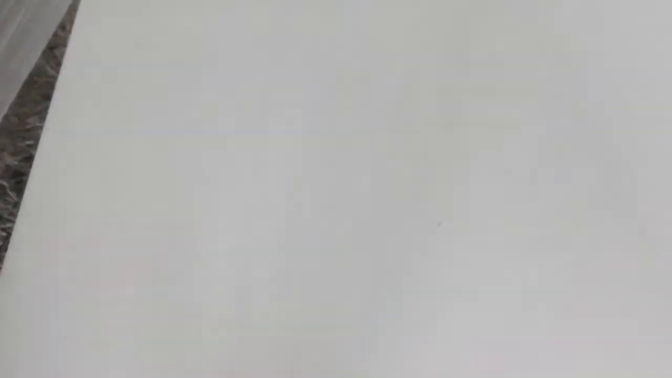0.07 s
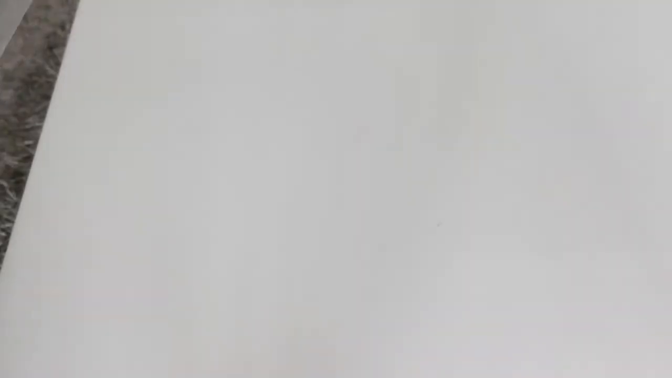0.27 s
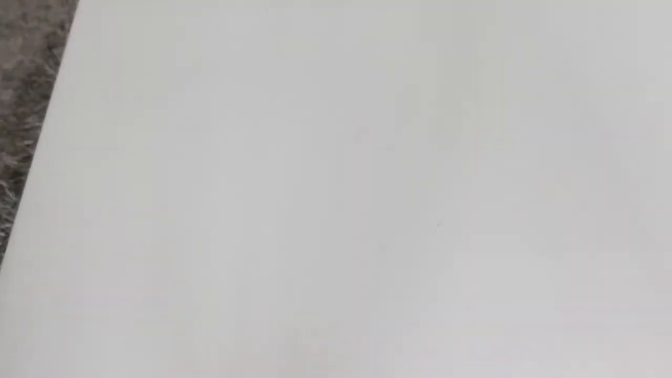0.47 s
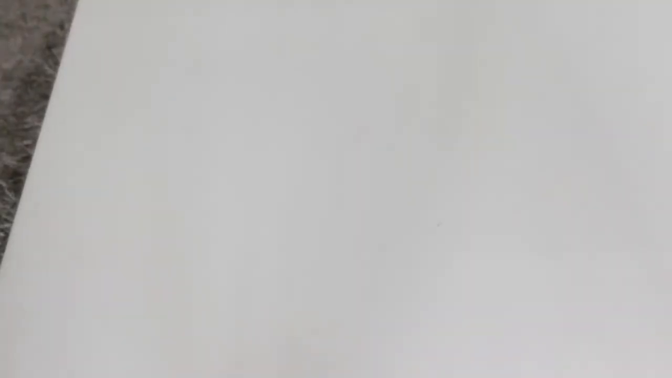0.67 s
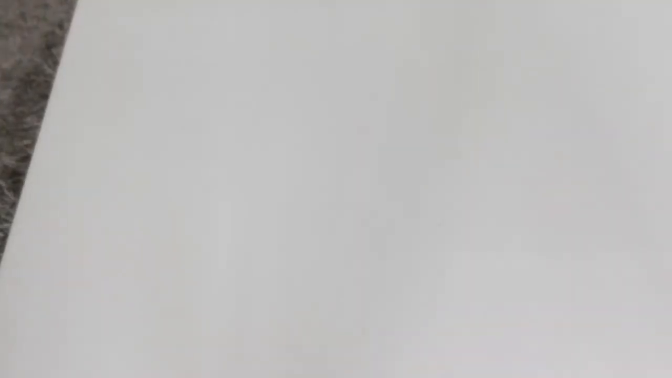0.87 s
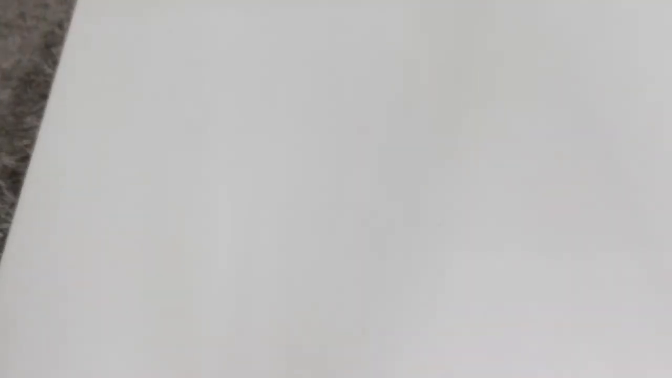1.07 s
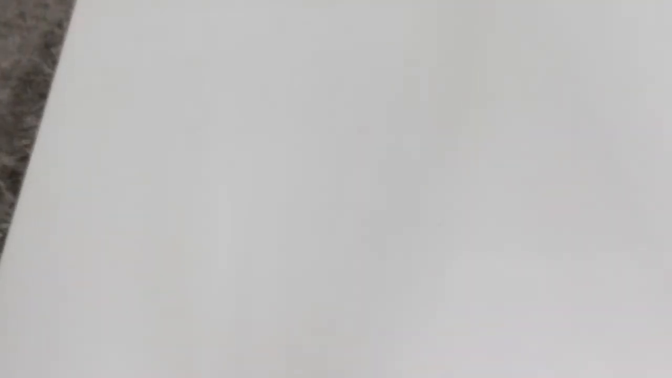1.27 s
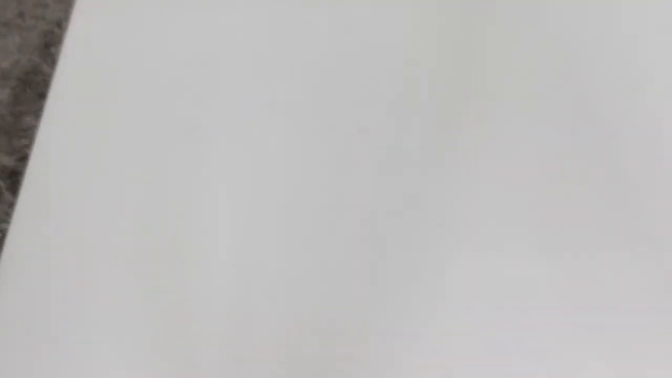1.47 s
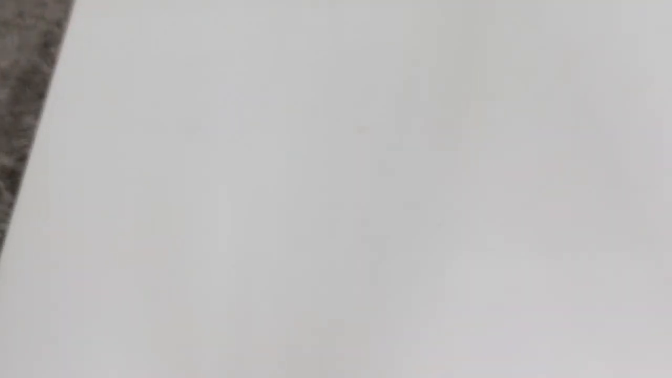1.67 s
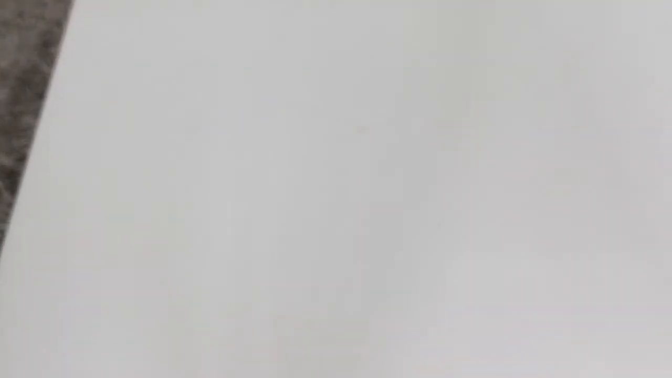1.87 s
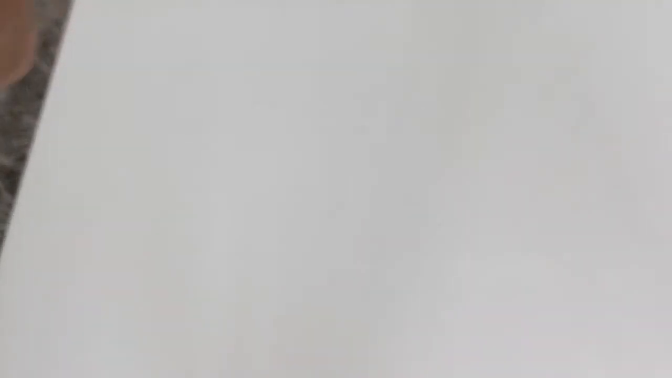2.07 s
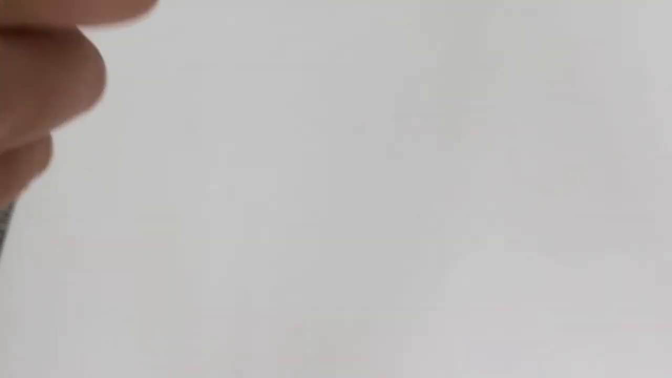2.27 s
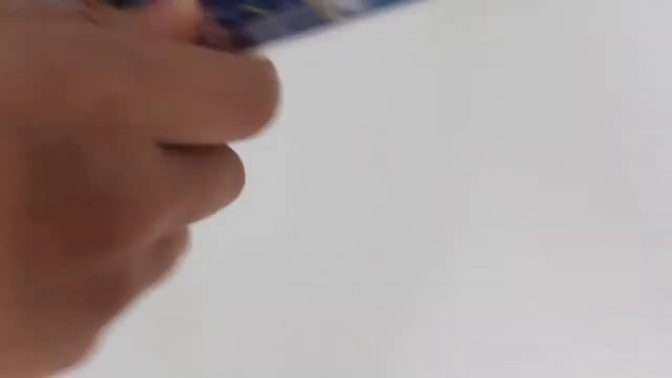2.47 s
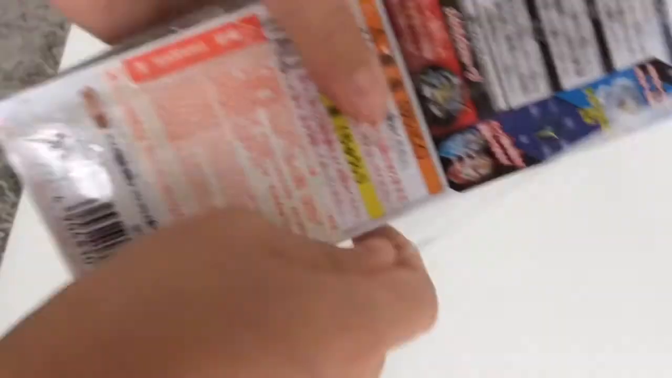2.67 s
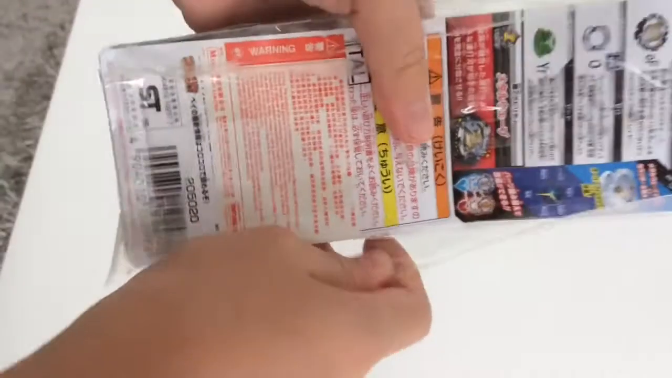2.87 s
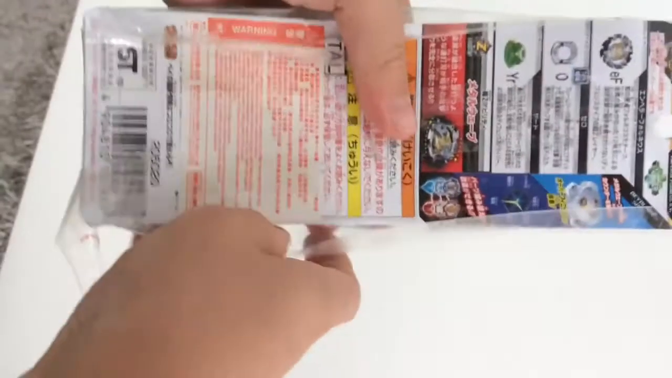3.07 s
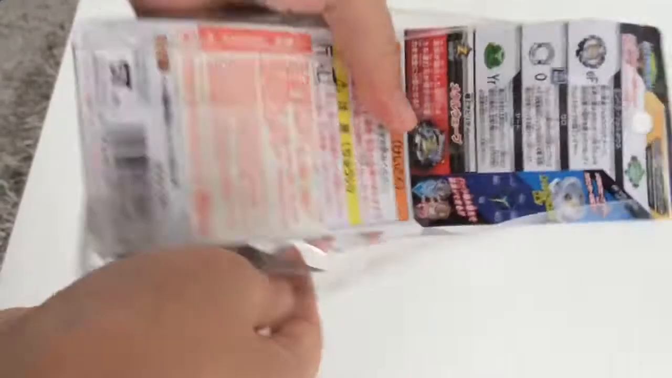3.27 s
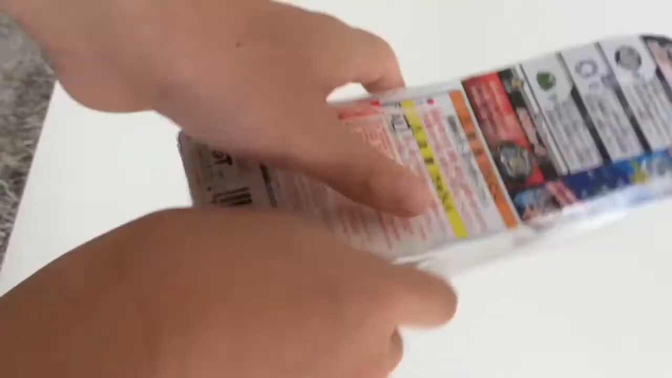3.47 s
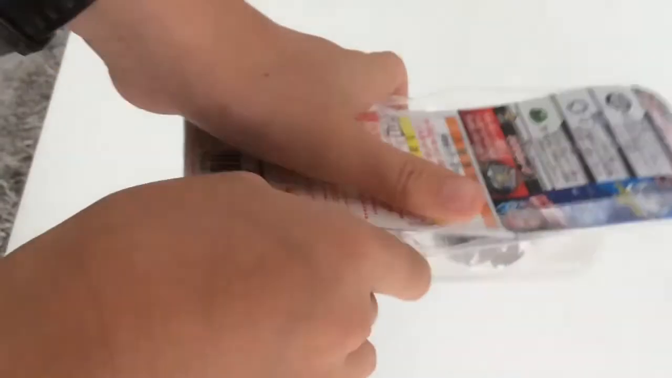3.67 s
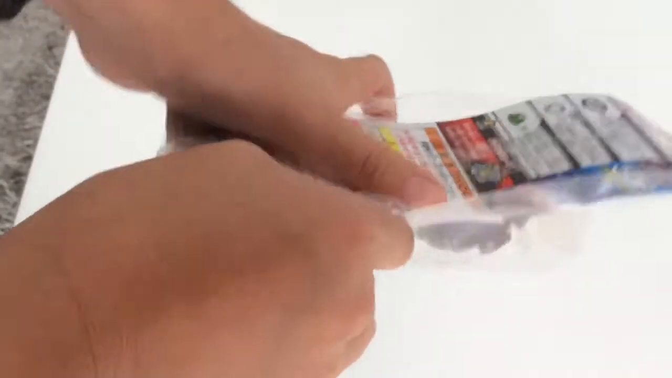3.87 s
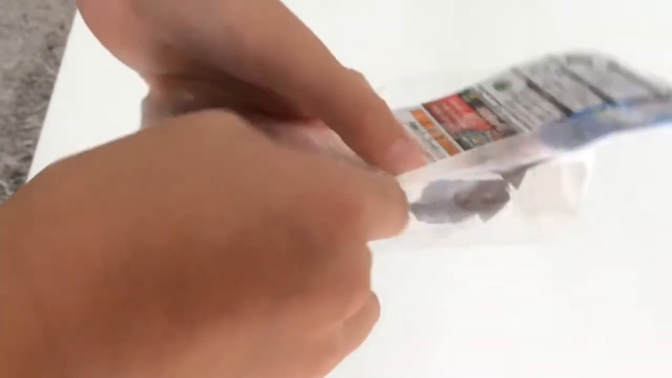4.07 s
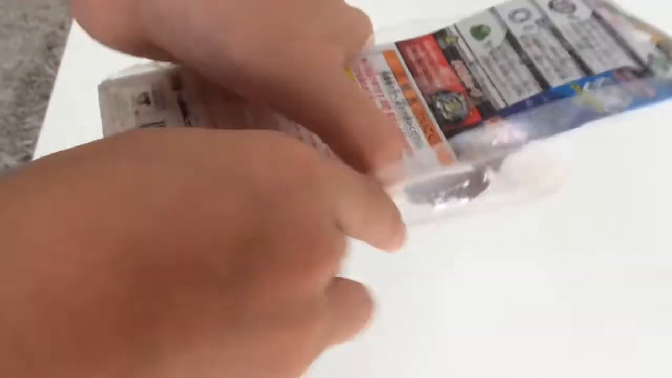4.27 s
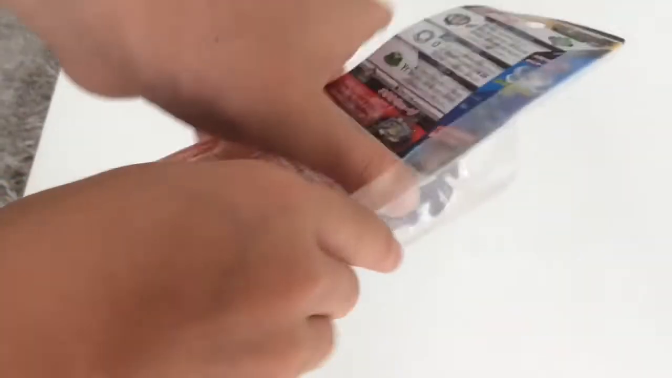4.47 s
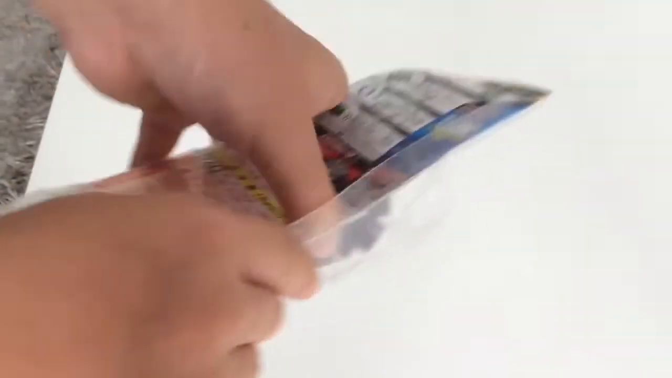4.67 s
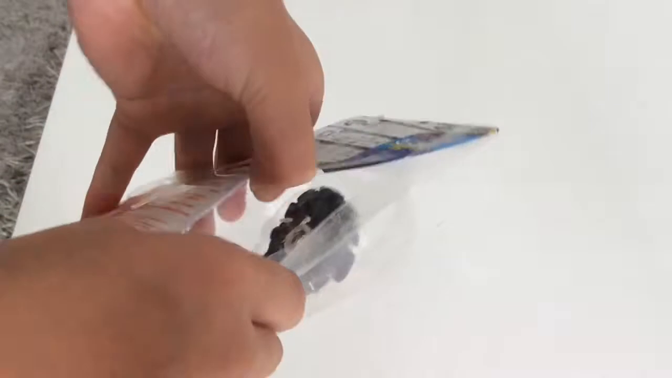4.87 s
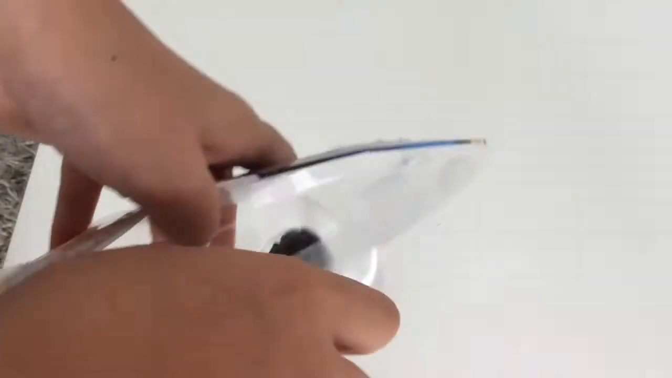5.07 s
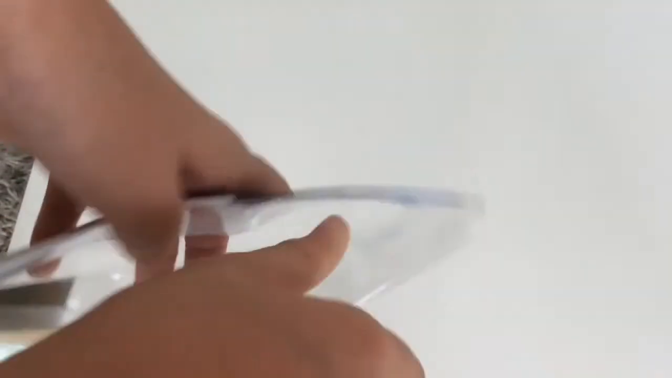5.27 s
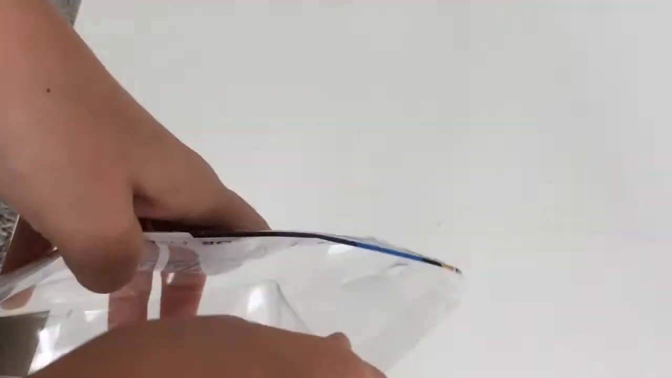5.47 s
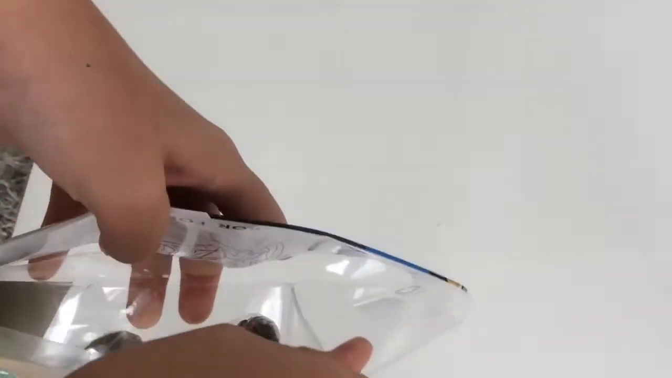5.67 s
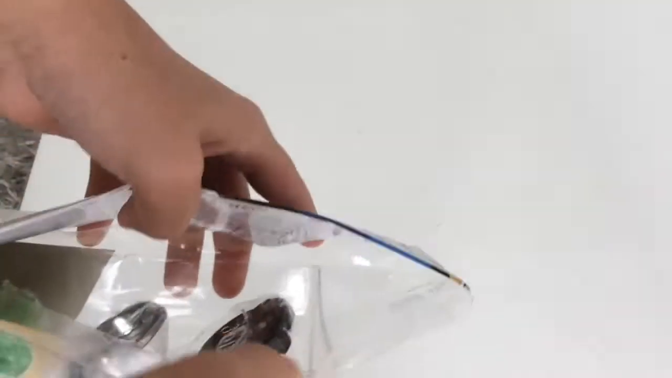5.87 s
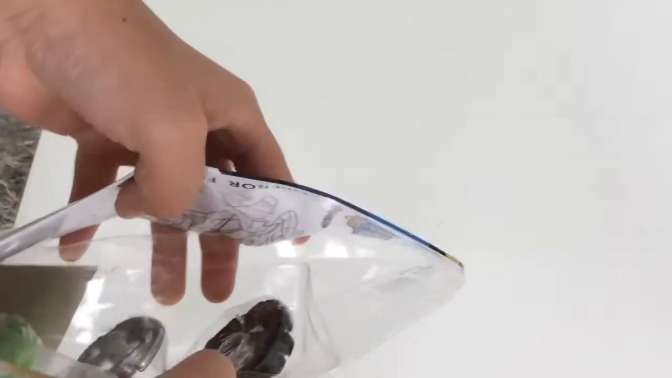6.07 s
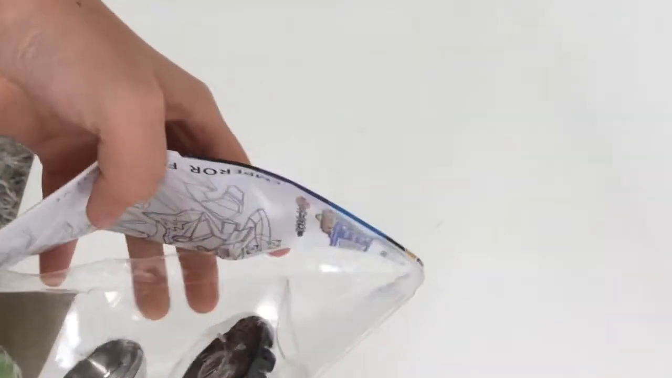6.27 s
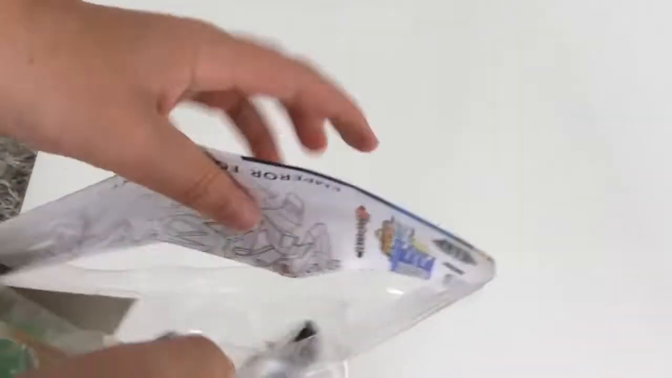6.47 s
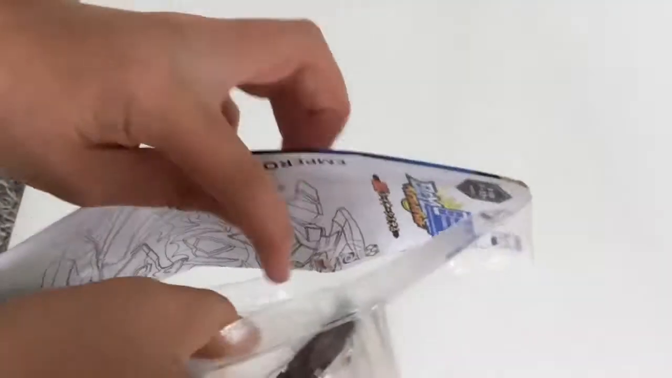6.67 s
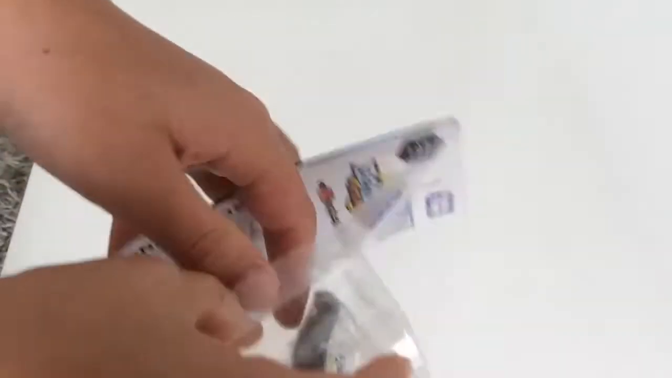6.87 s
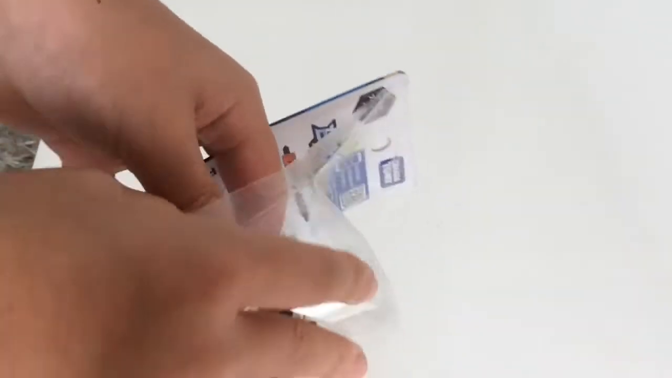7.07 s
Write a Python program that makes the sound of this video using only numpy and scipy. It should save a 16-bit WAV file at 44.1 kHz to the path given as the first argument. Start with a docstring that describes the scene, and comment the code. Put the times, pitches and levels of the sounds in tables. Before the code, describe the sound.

Close, dry handling of stiff plastic and card in a small room, over faint low room tone. At about 0.1 s the pack knocks twice on the table, boxy with a sharp crack. It is then almost silent, with a small bright click near 0.9 s. From 1.4 to 2.7 s there are soft low bumps, muffled rubbing, light ticks and a faint creak around 2.2 s. From 2.8 s crackling thickens with short seal creaks; loud snaps and hollow pops land near 3.3 and 3.4 s with a scratchy slide. More cracks follow at 3.8 s, fine creaks around 4.0-4.2 s, and a strong snap at 4.3 s. The biggest hollow pop comes at 5.0 s. Lighter, scattered crinkles follow, then hard cracks with thumps around 6.3 s, sharp snaps at 6.55 and 6.75 s, and small ticks around 7.1 s.

```python
"""A stiff plastic blister is pried off its backing card close to a microphone, in a small room.
Creases crack as noise bursts through sheet resonances; the seal creaks in runs of the same snaps.
Walls of the hollow pop as damped sines; the film slides and rustles as grains of noise in bands.
Early on the pack knocks on the table; later, soft contacts thump at low pitch. Room tone is steady."""
import sys
import numpy as np
from scipy import signal
from scipy.fft import rfft, irfft, next_fast_len
from scipy.io import wavfile
from scipy.ndimage import map_coordinates

SR = 44100
rng = np.random.default_rng(int(sys.argv[2]) if len(sys.argv) > 2 else 0)


def pcm_store(signal):
    """Save signal as 16-bit PCM."""
    levels = np.round(np.clip(np.atleast_2d(signal), -1, 1) * 32767)
    wavfile.write(sys.argv[1], SR, levels.astype(np.int16).T)


N = 314433  # length in samples


def amp(db):
    """Decibel law: the amplitude gain of a level in dB."""
    return 10 ** (np.asarray(db) / 20)


def unit(x):
    """Normalization: x at rms 1."""
    return x / np.sqrt(np.mean(x ** 2) + 1e-20)


def peak(rows):
    """Normalization: each row at peak 1."""
    return rows / np.abs(rows).max(axis=1, keepdims=True)


def along(points, hz):
    """Logarithmic frequency scale: (Hz, value) points joined by straight lines on it."""
    f, v = np.transpose(points)
    return np.interp(np.log(hz + 1), np.log(f + 1), v)


def filtered(x, response):
    """Linear filtering: the spectrum of x times a response of frequency."""
    n = x.shape[-1]
    padded = next_fast_len(n + 4096)
    spectrum = rfft(x, padded) * response(np.fft.rfftfreq(padded, 1 / SR))
    return irfft(spectrum, padded)[..., :n]


def body(modes):
    """Modal superposition: causal resonances (Hz, width Hz, dB) summed with alternating sign."""
    def mode(f, center, width, db):
        return amp(db) * 1j * f * width / (center * center - f * f + 1j * f * width)
    return lambda f: sum((-1) ** k * mode(f, *row) for k, row in enumerate(modes))


def ring(t, hz, t60, rise):
    """Free decay of one mode: a damped sine with a soft start."""
    return np.sin(2 * np.pi * hz * t) * amp(-60 * t / t60) * (1 - np.exp(-t / rise))


def place(times, sounds):
    """Superposition: rows of sounds summed at their times."""
    out = np.zeros(N + sounds.shape[1])
    for start_s, row in zip(times, sounds):
        out[round(start_s * SR):][:len(row)] += row
    return out[:N]


def grains(rate, spread_db, life):
    """Stick-slip friction: random slips (per s) of uneven size, each a puff of noise decaying over life (s)."""
    size = amp(spread_db * np.minimum(rng.exponential(size=N), 3))
    slips = (rng.random(N) < rate / SR) * size
    envelope = signal.lfilter([1], [1, -np.exp(-1 / (life * SR))], slips)
    return unit(envelope * rng.standard_normal(N))


# spectral shape of the room tone: pitch_hz [Hz], relative density_db [dB]
AIR_SPECTRUM = [(15, -73.5), (30, -16), (80, -1), (140, -10.5), (245, -11), (400, -18), (700, -24),
                (3000, -36.5), (7700, -28.5), (11000, -36.5), (15500, -43.5), (16500, -62)]
AIR_DB = -62  # rms level


def air():
    """Stationary noise: white noise shaped into the steady room tone."""
    return amp(AIR_DB) * unit(filtered(rng.standard_normal(N), lambda f: amp(along(AIR_SPECTRUM, f))))


# handling over time: start_s [s], flexing_db of the hollow [dB], sliding_db of the film [dB]
HAND_MOTION = [(0.0, -51, -73), (0.18, -53, -60), (0.42, -75, -73.5), (1.41, -76, -74.5),
               (1.57, -54, -65.5), (2.66, -51, -60), (3.06, -42, -57.5), (3.37, -43, -39.5),
               (3.53, -51, -59), (4.13, -48.5, -52), (4.39, -43.5, -57), (4.71, -59.5, -59.5),
               (4.91, -51, -67.5), (5.04, -36, -50), (5.18, -55, -68), (5.66, -51, -62), (6.31, -41, -73),
               (6.41, -46, -67), (6.91, -63.5, -62.5), (7.13, -52, -73)]
# resonances of card and trapped air: pitch_hz [Hz], width_hz [Hz], level_db [dB]
HOLLOW_MODES = [(152, 108, -13), (456, 113, -7), (728, 73, -1.5), (952, 355, -11)]
# resonances of the sheet, which the cracks excite too: pitch_hz [Hz], width_hz [Hz], level_db [dB]
SHEET_MODES = [(1410, 286, 0), (2260, 280, -3), (3185, 1150, -0.5), (3956, 2290, -2.5), (5650, 1660, -4.5)]
# its treble resonances, likewise shared: pitch_hz [Hz], width_hz [Hz], level_db [dB]
SIZZLE_MODES = [(7590, 1470, 9), (9980, 360, 9), (12300, 8900, 3)]
FIZZ_DB = -3  # treble of the sliding, relative to its rustle
GRIP_RATE, GRIP_DB = 9, 5  # the grip wavers: knots per second, depth in dB


def handling():
    """Forced resonance: countless small creases and rubbing fingers excite the sheet and the hollow."""
    s, *levels = np.transpose(HAND_MOTION)
    murmur, rustle = (amp(np.interp(np.arange(N) / SR, s, db)) for db in levels)
    rubbing = grains(rate=910, spread_db=3.5, life=0.00098)
    ticks = grains(rate=200, spread_db=4, life=0.0004)
    flexing = grains(rate=220, spread_db=3, life=0.004)
    knots = rng.standard_normal(int(N * GRIP_RATE / SR) + 4)
    grip = map_coordinates(knots, [np.arange(N) * GRIP_RATE / SR])
    murmur = murmur * amp(GRIP_DB * grip)
    hollow = unit(filtered(flexing + 0.15 * rubbing, body(HOLLOW_MODES)))
    sheet = unit(filtered(rubbing + 0.1 * ticks, body(SHEET_MODES)))
    fizz = unit(filtered(0.28 * rubbing + ticks, body(SIZZLE_MODES)))
    return murmur * hollow + rustle * sheet + amp(FIZZ_DB) * rustle * fizz


# gain of the top treble toward the microphone as the pack turns: start_s [s], level_db [dB]
TREBLE_TURN = [(0.1, 14.5), (0.6, 3), (1.5, -19), (3.2, -11), (3.9, -16), (4.601, -35), (5.4, -36),
               (6.2, -25), (7.0, -13)]


def facing(x):
    """Directivity: the top treble is beamed, so it follows the turn of the pack."""
    s, db = np.transpose(TREBLE_TURN)
    top = filtered(x, lambda f: 1 / (1 + (11000 / (f + 1)) ** 8))
    return x + top * (amp(np.interp(np.arange(N) / SR, s, db)) - 1)


def snap(rows, life, facet_share, alike):
    """Impulsive excitation: a crease gives way in a noise burst that rings the sheet and its own facet."""
    s, db, crease_hz, sizzle_db = np.asarray(rows)[:, :, None]
    t = np.arange(SR // 20) / SR
    t60 = life * amp(0.063 * (db + 54.5))  # big ones last longer
    facet_t60, sizzle_t60 = 0.22 * t60, 0.41 * t60
    onset = 0.0011  # s
    noise = rng.standard_normal((len(s), 2, len(t)))
    # a shared share of noise makes the snaps alike
    noise = (noise + alike * noise[0]) * (1 - np.exp(-(t / onset) ** 2))
    sheet = peak(filtered(noise[:, 0] * amp(-60 * t / t60), body(SHEET_MODES)))
    facet = peak(ring(np.maximum(t - onset / 2, 0), crease_hz, facet_t60, 0.00055))
    sizzle = peak(filtered(noise[:, 1] * amp(-60 * t / sizzle_t60), body(SIZZLE_MODES)))
    burst = 0.65 * sheet + facet_share * facet + amp(sizzle_db) * sizzle
    return place(s[:, 0] - onset / 2, amp(db) * burst)


# single creases giving way: start_s [s], level_db before the layers are weighted [dB],
# pitch_hz of the crease [Hz], sizzle_db relative to level_db [dB]
CREASES = [(0.0855, -22.5, 2030, -18), (0.1315, -8, 3030, -14), (0.1372, -17.5, 6260, -3.5),
           (0.832, -38.5, 2650, -13), (0.8918, -20.5, 4430, 5.5), (0.906, -31, 6000, -5),
           (1.4125, -23, 2260, -8.5), (1.479, -35, 2370, -4.5), (1.5763, -32.5, 2190, -19),
           (1.6282, -27, 2080, -17), (1.9798, -29.5, 5700, -3), (2.106, -33, 2280, -9),
           (2.3782, -24, 6500, -3.5), (2.4124, -27.5, 3730, 3.5), (2.566, -21.5, 5700, 5),
           (2.7083, -27.5, 6400, 9), (2.8237, -23, 2300, 3), (2.8829, -31, 3870, 3),
           (2.8988, -21, 3850, -1.5), (3.1976, -29.5, 5930, 7), (3.2167, -24.5, 3700, 1),
           (3.2382, -25, 3550, 3), (3.2506, -30, 6600, 12.5), (3.2655, -11.5, 3360, 0.5),
           (3.275, -21.5, 4850, -2), (3.2834, -17.5, 3200, -1), (3.4048, -7.5, 2370, -12),
           (3.423, -26, 5000, 2), (3.4828, -26.5, 2700, 3), (3.4936, -29, 2760, -2),
           (3.6238, -34, 5760, 15.5), (3.616, -33, 3280, -1), (3.633, -56, 6450, 24),
           (3.7338, -34, 5960, 12), (3.6934, -27, 2080, 7), (3.7011, -23, 2920, 5.5),
           (3.7152, -32, 2870, 9), (3.7739, -15.5, 2600, -0.5), (3.803, -11, 3230, -17),
           (3.814, -21, 3600, -18), (3.8272, -22, 2870, -11), (3.9444, -22, 5650, -12),
           (4.2823, -25, 2550, 2), (4.2906, -7.5, 3640, 0.5), (4.3293, -23, 1930, -17),
           (4.4326, -30, 3500, -2), (4.55, -31.5, 3800, 1), (4.609, -19, 2610, -2.5),
           (4.6145, -22.5, 3330, -16), (4.8946, -13.5, 3780, -5.5), (4.9324, -24, 2300, -6),
           (5.0157, -10.5, 2500, -2.5), (5.0372, -24, 3320, -5), (5.0693, -26, 3380, -22),
           (5.4324, -27, 4030, -4), (5.503, -28, 4500, -13), (5.6111, -34.5, 2920, -2),
           (5.621, -36.5, 4000, 5), (5.683, -35, 5030, -2), (5.77, -48, 3500, -10),
           (5.8127, -19, 2370, -40), (5.848, -40, 6500, -1), (5.918, -29.5, 6500, -6),
           (5.952, -39.5, 4000, -1.5), (6.236, -37.5, 3470, -7), (5.879, -21.5, 2580, -2.5),
           (6.0095, -14.5, 4360, -8), (6.0347, -23, 2930, -27), (6.2792, -12.5, 2530, -4),
           (6.3433, -8.5, 3250, 1), (6.3801, -23, 4160, -20), (6.512, -26.5, 2660, -18),
           (6.5496, -14.5, 6640, -3.5), (6.7366, -4.5, 3240, -8), (7.063, -39, 4260, -12),
           (7.1195, -37, 2400, -24)]


def cracks():
    """Sudden release of strain: single creases snap, each with its own colour."""
    return snap(np.transpose(CREASES), life=0.017, facet_share=0.52, alike=0)


# reverberation time of the room: pitch_hz [Hz], t60_s [s]
ROOM_DECAY = [(200, .35), (1000, .45), (3500, .48), (8000, .33), (15000, .18)]


def room(x, wet_db):
    """Reverberation: the walls answer after a short gap; each stretch of sound meets a new tail."""
    out, hop = np.zeros(N + SR), SR // 4
    for i in range(0, N, hop):
        hz, t, z = signal.stft(rng.standard_normal(SR // 2), SR, nperseg=256)
        decay = amp(-60 * t / along(ROOM_DECAY, hz)[:, None])
        tail = signal.istft(z * decay, SR, nperseg=256)[1]
        wet = signal.fftconvolve(x[i:i + hop], tail / np.linalg.norm(tail))
        out[i + round(0.011 * SR):][:len(wet)] += wet
    return amp(wet_db) * out[:N]


# the pack knocks on the table: start_s [s], level_db applied to the ringing card [dB]
TABLE_KNOCKS = [(0.087, -17.5), (0.136, -12.5)]
# modes of the closed pack: pitch_hz [Hz], level_db [dB], t60_s [s]
CARD_MODES = [(381, -5, 0.084), (692, -2.5, 0.032)]


def knocks():
    """Impact on a resonator: the closed pack rings like a small box."""
    s, db = np.transpose(TABLE_KNOCKS)
    t = np.arange(SR // 2) / SR
    box = sum(amp(level) * ring(t, hz, t60, 0.0006) for hz, level, t60 in CARD_MODES)
    return place(s, amp(db)[:, None] * box)


# the blister wall flips and the hollow pops: start_s [s], level_db [dB], pitch_hz [Hz]
WALL_POPS = [(0.893, -30.5, 720), (1.412, -18.5, 696), (1.6304, -26, 670), (1.819, -29, 596),
             (2.3774, -23, 680), (2.6137, -25.5, 525), (2.824, -27, 704), (2.9009, -27, 684),
             (2.9196, -26.5, 880), (3.017, -23.5, 923), (3.247, -27.5, 940), (3.2658, -9.5, 884),
             (3.2881, -17.5, 705), (3.3753, -23, 1036), (3.4036, -3.5, 875), (3.7778, -12.5, 810),
             (3.8033, -22, 910), (3.8311, -22.5, 710), (3.9451, -24, 864), (3.9756, -28, 830),
             (4.027, -22.5, 800), (4.1858, -26, 714), (4.1983, -27.5, 880), (4.2905, -7.5, 937),
             (4.3288, -20, 812), (4.3397, -25, 760), (4.3895, -25.5, 790), (4.6072, -23, 886),
             (4.8951, -26, 930), (4.991, -23, 950), (5.0176, -0.5, 919), (5.0695, -13, 706),
             (5.098, -15, 837), (5.16, -25, 970), (5.42, -21, 834), (5.5049, -30.5, 980),
             (5.6282, -30, 830), (5.696, -21, 810), (5.8123, -17, 897), (5.8798, -18, 944),
             (6.0128, -17.5, 922), (6.0355, -27.5, 894), (6.2811, -13.5, 765), (6.2916, -20.5, 996),
             (6.3447, -13, 778), (6.5509, -17.5, 920), (6.7346, -17, 890), (7.025, -35.5, 976),
             (7.1192, -26.5, 866)]


def pops():
    """Snap-through buckling: the hollow answers with a few cycles; a lower neighbour mode beats with them."""
    s, db, hz = np.transpose(WALL_POPS)[:, :, None]
    t = np.arange(SR // 10) / SR
    neighbour_hz = hz * (0.78 + 0.015 * rng.standard_normal(hz.shape))
    main = ring(t, hz, 0.015, 0.0018)
    neighbour = ring(t, neighbour_hz, 0.04, 0.00078)
    return place(s[:, 0], amp(db) * peak(main + 0.13 * neighbour))


# soft hand and table contacts: start_s [s], level_db [dB], pitch_hz [Hz]
CONTACTS = [(1.409, -30, 125), (1.654, -39.5, 147), (1.822, -28.5, 116), (2.379, -32.5, 144),
            (2.618, -29.5, 163), (3.283, -31, 190), (3.776, -25.5, 365), (4.025, -31, 372),
            (5.018, -30, 313), (5.082, -32, 115), (6.04, -37, 181), (6.279, -24.5, 380), (6.34, -17, 415)]


def thumps():
    """Heavily damped oscillation: soft contacts give a few low cycles."""
    s, db, hz = np.transpose(CONTACTS)[:, :, None]
    t = np.arange(SR // 5) / SR
    t60 = 5 / hz + 0.01  # s
    return place(s[:, 0], amp(db) * peak(ring(t, hz, t60, 0.00087)))


# film sliding over film or card, in swells: top_s [s], rise_s [s], fall_s [s],
# level_db (rms of the band before its swell) [dB], pitch_hz of the band centre [Hz]
SLIDES = [(1.62, 0.041, 0.031, -42, 550), (1.96, 0.033, 0.034, -51.5, 670), (2.4, 0.021, 0.015, -42.5, 730),
          (4.92, .015, 0.029, -44, 4270), (1.631, 0.028, 0.014, -54, 1720),
          (1.746, 0.0024, 0.01, -45, 4460), (1.981, 0.033, 0.013, -46, 5350),
          (2.562, 0.053, 0.012, -37, 6800), (2.611, 0.0059, 0.014, -39, 2700),
          (2.836, 0.012, 0.017, -40, 5100), (3.373, 0.037, 0.084, -44, 3280),
          (3.384, .035, .02, -39, 12000), (3.82, 0.0091, 0.029, -43.5, 3480),
          (4.2, 0.035, 0.12, -44.5, 5500), (5.041, 0.055, 0.091, -44.5, 2600),
          (5.387, 0.028, 0.01, -35, 6700), (6.368, 0.015, 0.022, -44, 4000),
          (6.464, 0.029, 0.02, -41, 3330)]


def rubs():
    """Sliding friction: dense slips swell and fade, in a broad band set by the tension of the film."""
    s, rise, fall, db, hz = np.transpose(SLIDES)[:, :, None]
    lead = SR // 6  # samples before the top of a swell
    t = np.arange(-lead, lead) / SR
    fine = grains(rate=1500, spread_db=2, life=0.001)
    sparse = grains(rate=200, spread_db=2, life=0.0007)
    slips = (fine + 0.6 * sparse)[:len(s) * len(t)].reshape(len(s), -1)
    band = filtered(slips, body([(hz, 0.92 * hz, 0)]))
    swell = np.exp(-(t / np.where(t < 0, rise, fall)) ** 2)
    out = place(s[:, 0], amp(db) * swell * band / band.std(axis=1, keepdims=True))
    return np.pad(out[lead:], (0, lead))  # each top falls on its time


# the seal lets go in runs of slips: first_s [s], last_s [s], slips [count], slowing [power],
# first_db and last_db before the layers are weighted [dB], pitch_hz [Hz], sizzle_db relative to those [dB]
SEAL_RUNS = [(2.163, 2.274, 9, .96, -34, -46, 2270, -9), (2.782, 2.8149, 4, 1.12, -26, -29.5, 2280, -4.5),
             (2.9177, 2.955, 4, .95, -18.5, -24, 2480, -5.5),
             (2.9822, 3.025, 5, 0.91, -28.5, -24.5, 2540, 0.5),
             (3.0425, 3.0766, 7, 1.06, -29.5, -32.5, 5600, 0.5),
             (3.09, 3.157, 5, 1.25, -35.5, -32, 2920, 5), (3.311, 3.408, 30, .67, -33.5, -28, 3970, -1),
             (3.9115, 3.9946, 11, 1.1, -26, -24.5, 5460, -10), (4.0678, 4.103, 4, 0.99, -60, -54, 5800, 15),
             (4.1117, 4.157, 7, 0.9, -35, -26.5, 3500, -0.5), (4.167, 4.189, 5, .85, -33, -27.5, 5740, 1.5),
             (4.193, 4.225, 4, .97, -27, -34, 5460, -2), (5.3666, 5.3913, 4, 0.69, -28.5, -29.5, 3350, 8),
             (6.436, 6.472, 3, 1.25, -30, -25, 2900, -5)]
SLIP_JITTER_S, SLIP_SCATTER_DB, SLIP_DETUNE = 0.00062, 1, 0.054  # slip to slip; detune in log pitch


def creaks():
    """Stick-slip: runs of short slips at one spot, so of one colour; the gaps grow or shrink along the run."""
    out = np.zeros(N)
    for first, last, count, slowing, first_db, last_db, hz, sizzle_db in SEAL_RUNS:
        u = np.linspace(0, 1, round(count))
        jitter, size, detune, fizz = rng.standard_normal((len(u), 4)).T
        rows = [first + (last - first) * u ** slowing + SLIP_JITTER_S * jitter,
                first_db + (last_db - first_db) * u + SLIP_SCATTER_DB * size,
                hz * np.exp(SLIP_DETUNE * detune),
                sizzle_db + SLIP_SCATTER_DB * fizz]
        out += snap(rows, life=0.019, facet_share=0.54, alike=1.4)
    return out


SIDES = 3  # directions of radiation that the walls gather


def scene():
    """Direct and reverberant field: each side of the pack sends the walls its own version of each crack."""
    sharp = [facing(cracks() + creaks() + rubs()) for _ in range(SIDES)]
    hollow = pops() + knocks()
    wet = sum(room(side + amp(2.5) * hollow, wet_db=-19.5) for side in sharp)
    direct = sharp[0] + hollow + thumps() + facing(handling())
    return (direct + wet + air())[None]


TOP_HZ = 16500  # upper band limit


def record(dry):
    """Saturation and band limits: tall peaks round off, then deep bass and all above TOP_HZ are removed."""
    rounded = dry / (1 + np.abs(dry / 0.99) ** 8) ** (1 / 8)
    bass_cut = lambda hz: (1j * hz / (1j * hz + 45)) ** 2  # the microphone's
    return filtered(rounded, lambda hz: bass_cut(hz) * (hz < TOP_HZ))


dry = scene()
out = record(dry)
pcm_store(out)
```